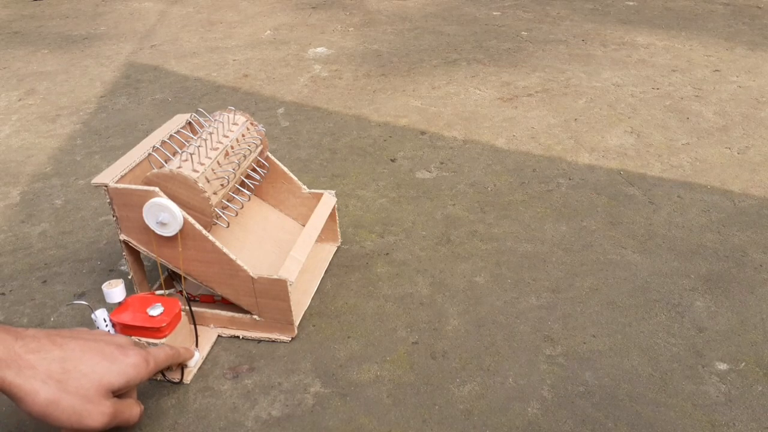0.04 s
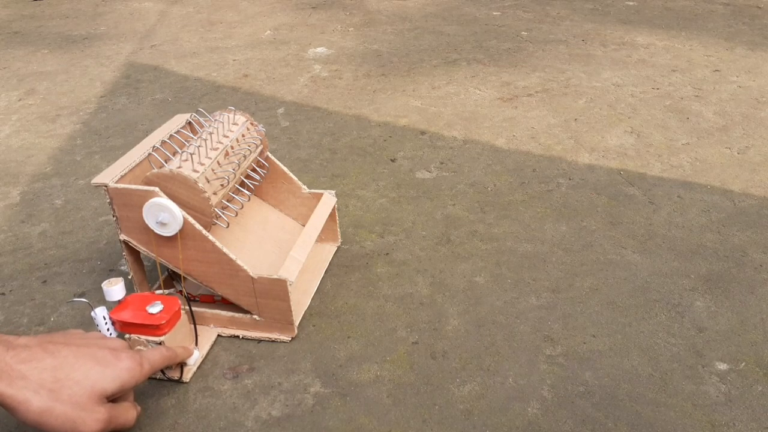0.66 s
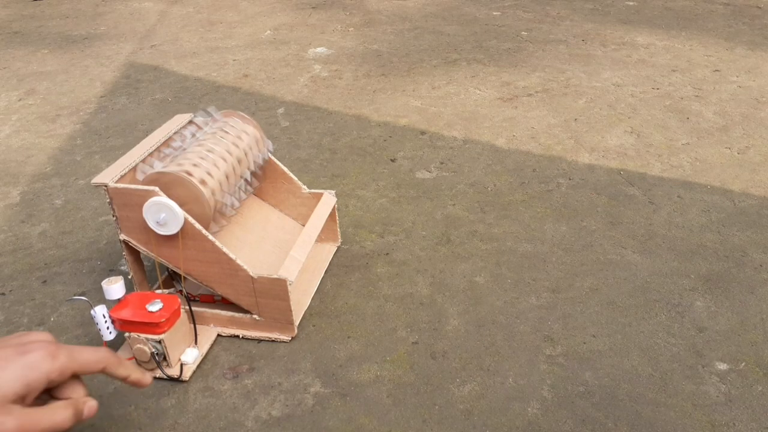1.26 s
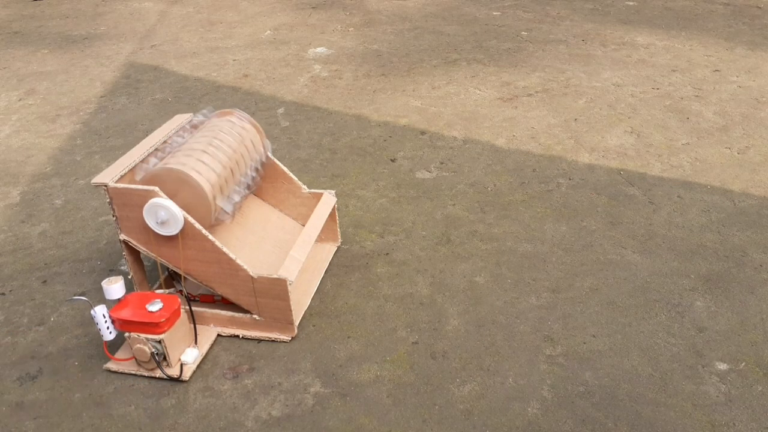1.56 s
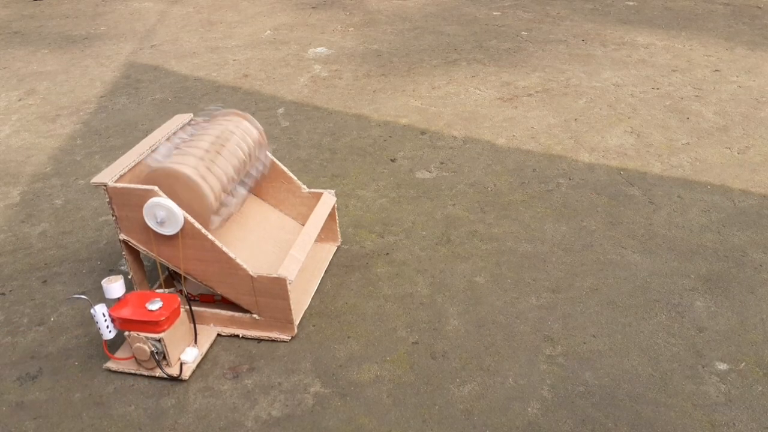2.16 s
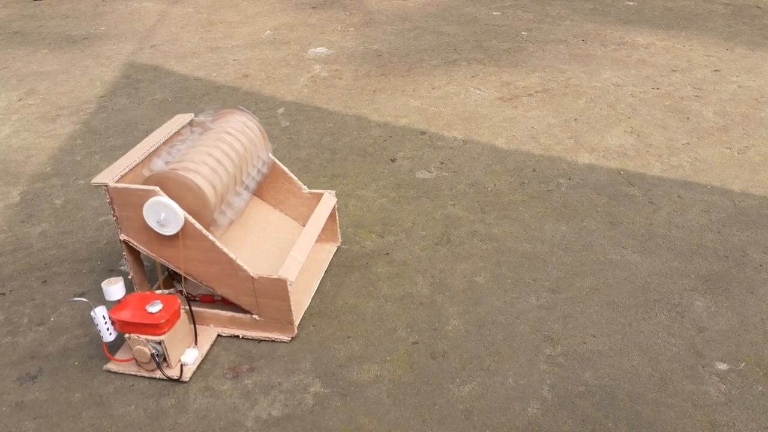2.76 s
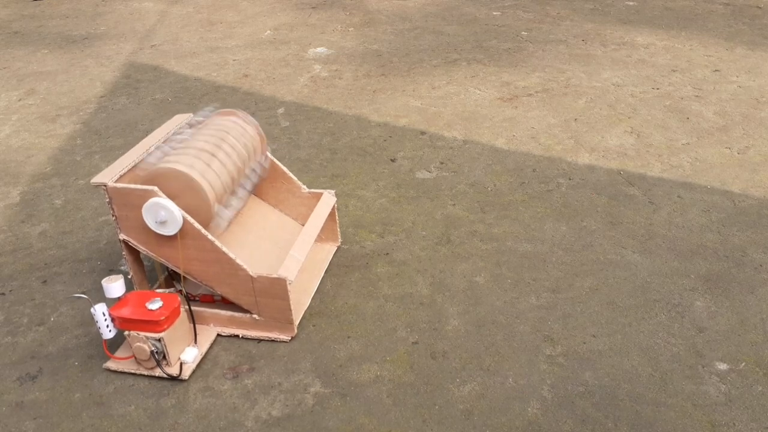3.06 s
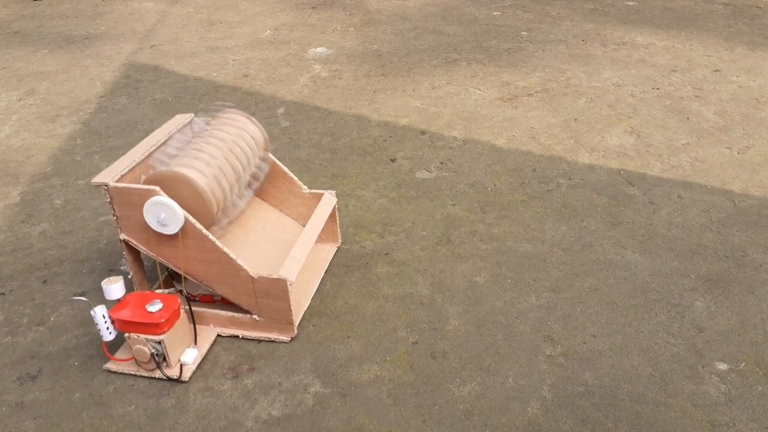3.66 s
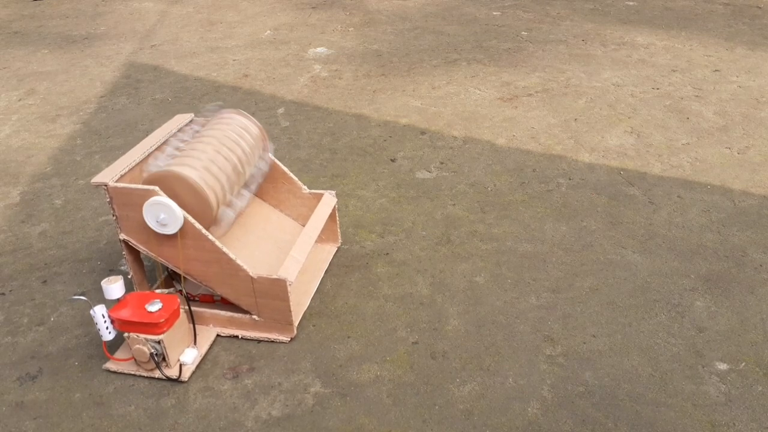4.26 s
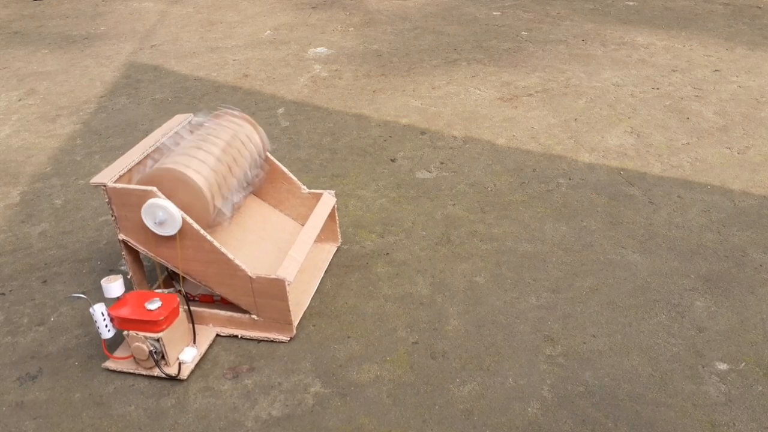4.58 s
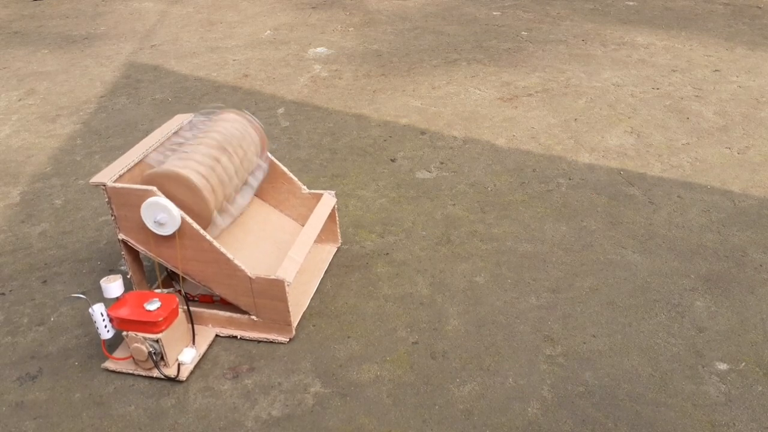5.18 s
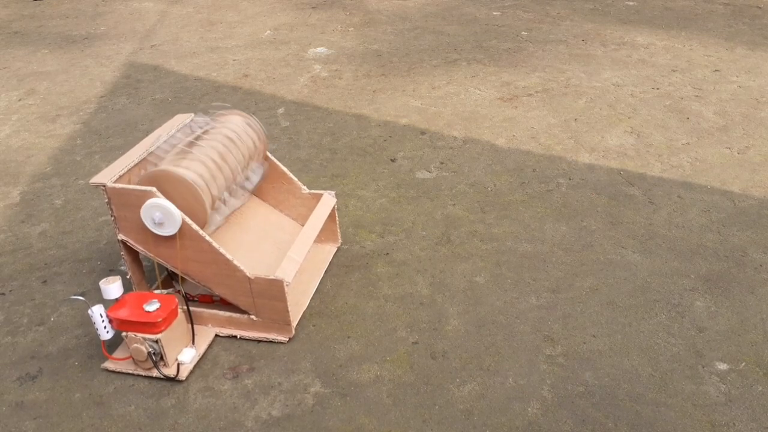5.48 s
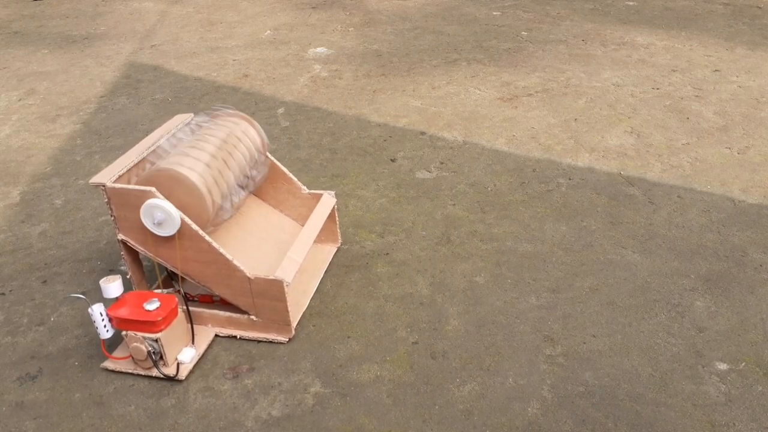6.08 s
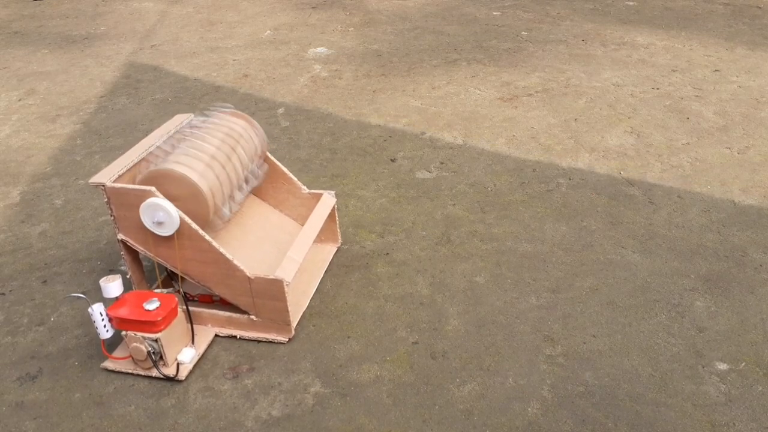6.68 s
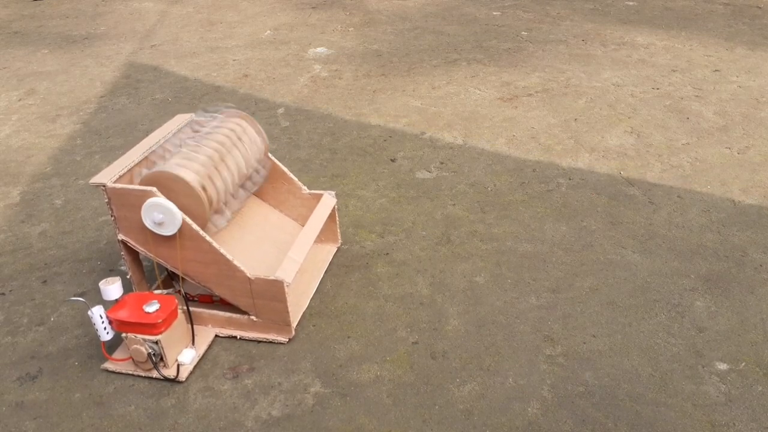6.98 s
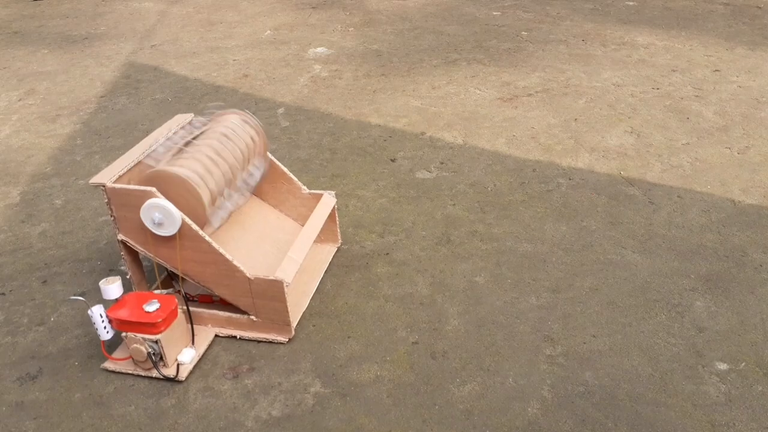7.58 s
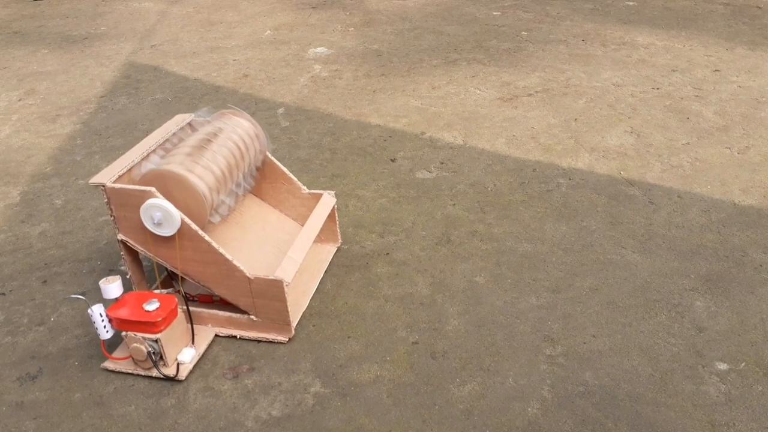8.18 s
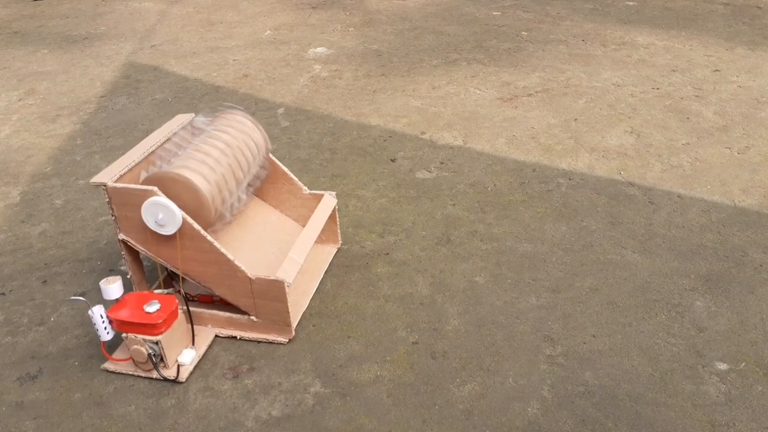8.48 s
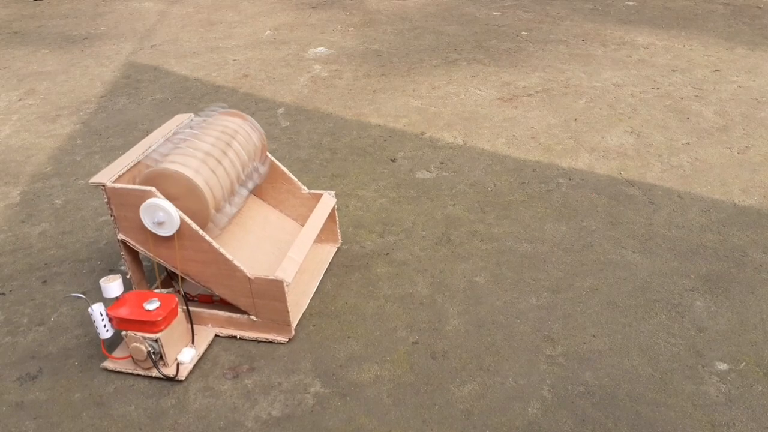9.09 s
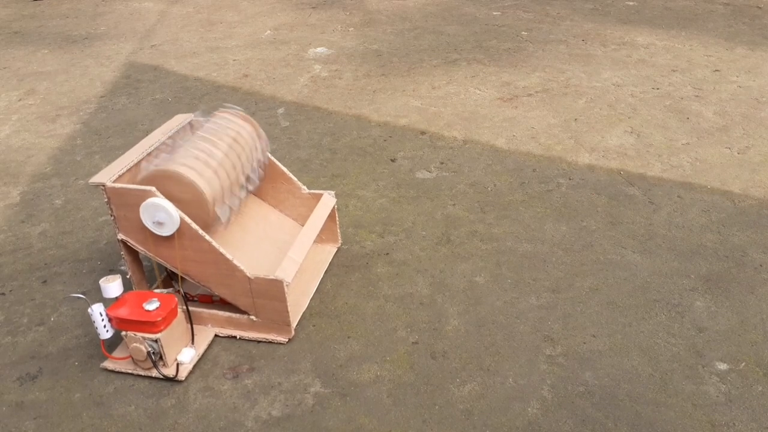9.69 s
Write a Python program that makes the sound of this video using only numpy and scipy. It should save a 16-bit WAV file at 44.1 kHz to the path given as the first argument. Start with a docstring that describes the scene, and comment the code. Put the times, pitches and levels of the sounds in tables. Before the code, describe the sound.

In a quiet yard, two crisp clicks of a button start a small wooden machine. Its electric motor and drum gather speed, the shaft rasping and rubbing on each turn. A fast, hollow wooden knocking takes over, mixed with thin scraping. It grows briefly harsher midway, then keeps rattling at a nearly even pace to the end.

```python
"""A wooden model machine in a yard. Over a faint hum a switch snaps down (0.75 s) and back (1.02 s). From 1.1 s
a small electric motor, brushes whirring, spins up the spiked drum to about 17 turns/s; the drum rumbles and its
shaft rubs at tight spots on every turn. From 2.5 s the shaft knocks in its loose bearings, a double blow per
turn that rings the wooden frame and echoes round the yard. The knocking is harder and brighter from 4.1 to 5.3
s, then runs on as the speed slowly sags."""
import sys
import numpy as np
from scipy import signal
from scipy.fft import rfft, irfft
from scipy.io import wavfile

SR = 44100
rng = np.random.default_rng(int(sys.argv[2]) if len(sys.argv) > 2 else 0)


def to_wav(sig):
    """Store sig (one row per channel, or 1-D mono) as 16-bit WAV at the path in sys.argv[1].

    Samples outside -1..1 are clipped; the rate is SR.
    """
    pcm = np.clip(np.atleast_2d(sig), -1, 1) * 32767
    pcm = np.round(pcm).astype(np.int16)
    wavfile.write(sys.argv[1], SR, pcm.T)  # frames by channels


N = 433944
TIME = np.arange(N) / SR
FREQS = np.arange(8193) * SR / 16384 + 1e-3
LOOSE_S, KNOCK_RISE_S = 2.5, 0.16  # shaft bounces free of its bearings

# spectrum of the shaken wooden base: (frequency [Hz], relative level [dB])
RUMBLE_SPECTRUM = [(25, -21), (60, -13), (100, -4.5), (135, 1), (200, -1.5), (340, 1.5), (480, -5),
                   (700, -12), (1100, -23.5), (2000, -29)]
# spectra of the button's snaps: (frequency [Hz], relative level [dB])
PRESS = [(59, -36), (100, -14), (394, -0.5), (791, -22), (1590, -24), (1920, -10), (2750, -33), (3180, -7),
         (3770, -1.5), (5630, -15), (6120, -26), (7560, -8), (10800, -29), (12800, -17), (15500, -19.5)]
RELEASE = [(59, -45), (100, -4), (447, -3.5), (1370, -6.5), (1960, -12), (2810, -12.5), (3770, 0),
           (4750, -12), (5400, -4), (6120, -19), (8410, -13), (9740, -31), (11800, -25), (13100, -7),
           (15500, -11.5)]


def undb(db):
    """Decibels to gain."""
    return 10 ** (np.asarray(db) / 20)


def minimum_phase(gain):
    """Most compact impulse response with these gains."""
    cepstrum = irfft(np.log(gain))
    half = len(cepstrum) // 2
    cepstrum[1:half] *= 2
    cepstrum[half + 1:] = 0
    return irfft(np.exp(rfft(cepstrum)))[:half]


def colour(spectrum, skirt_db_per_oct=24):
    """Unit-energy impulse response of a (Hz, dB) spectrum, rolled off beyond its ends."""
    hz, db = np.transpose(spectrum)
    outside_oct = np.abs(np.log2(FREQS / np.clip(FREQS, hz[0], hz[-1])))
    gain_db = np.interp(np.log(FREQS), np.log(hz), db) - skirt_db_per_oct * np.minimum(outside_oct, 2)
    response = minimum_phase(undb(gain_db))
    return response / np.linalg.norm(response)


def through(x, response):
    """Convolve, cut to scene length."""
    return signal.oaconvolve(x, response)[:N]


def add(out, at_s, sound):
    """Mix a sound in at a time."""
    start = int(np.clip(round(at_s * SR), 0, N))
    out[start:start + len(sound)] += sound[:N - start]


def wander(rate_hz):
    """Smooth random drift, spread near 1."""
    points = rng.standard_normal(2 ** 14)
    return np.interp(TIME * rate_hz, np.arange(len(points)), points)


def looseness(time_s, rise_s):
    """How far the shaft has worked loose, 0 to 1."""
    return 1 - np.exp(-np.maximum(time_s - LOOSE_S, 0) / rise_s)


def harshness(time_s, from_s=4.11, to_s=5.33, fade_s=0.25):
    """1 in the spell of hard knocking, 0 outside."""
    return np.clip(.5 + np.minimum(time_s - from_s, to_s - time_s) / fade_s, 0, 1)


def speed_gain(pace, base_db, rise_db):
    """Gain proportional to pace (share of full speed), with rise_db more from rest to full speed."""
    return pace * undb(base_db + rise_db * (pace - 1))


def yard_hum(level_db=-81.0):
    """Faint, slowly wavering outdoor hum."""
    # ambient noise: (frequency [Hz], relative level [dB])
    spectrum = [(18, -49), (30, -19), (216, -18.5), (296, -1), (355, -12.5), (524, -26), (597, -20),
                (680, -28), (2770, -27.5), (3230, -25), (3590, -30), (5170, -35), (8040, -29), (9390, -35),
                (15000, -35)]
    return undb(level_db + 1.8 * wander(5)) * through(rng.standard_normal(N), colour(spectrum))


def yard_echo(x, t60_s, wet_db):
    """Direct sound plus duller, scattered reflections from ground and walls."""
    t = TIME[:SR // 2]
    tail = rng.standard_normal(len(t)) * np.exp(-np.log(1000) * t / t60_s) * (1 - np.exp(-t / .012))
    tail = signal.sosfilt(signal.butter(1, 7000, fs=SR, output="sos"), tail)
    return x + undb(wet_db) * through(x, tail / np.linalg.norm(tail))


def motor_brushes(pace, full_speed_db=-62):
    """Brushes whirr on the commutator; noise power grows with speed."""
    # sliding noise: (frequency [Hz], relative level [dB])
    spectrum = [(3400, -11), (4200, 3), (5000, -8), (6500, -24), (8300, -6.5), (9200, -17)]
    envelope = np.sqrt(pace) * undb(full_speed_db + 1.8 * wander(200))
    return through(envelope * rng.standard_normal(N), colour(spectrum))


def switch(shudder_decay_s=0.04):
    """Plastic snaps as the button goes down and comes back; each shakes the wooden base."""
    # button snaps: (time [s], peak [dB], spectrum, shudder [dB])
    clicks = [(0.711, -62, PRESS, -64), (0.7435, -59, PRESS, -78), (0.751, -18.5, PRESS, -55),
              (1.0226, -14.5, RELEASE, -49.5)]
    snaps, shudder = np.zeros(N), np.zeros(N)
    for at_s, peak_db, spectrum, shudder_db in clicks:
        snap = colour(spectrum)
        add(snaps, at_s, undb(peak_db) * snap / np.abs(snap).max())
        add(shudder, at_s, undb(shudder_db) * np.exp(-TIME[:SR // 2] / shudder_decay_s))
    snaps = yard_echo(snaps, t60_s=0.36, wet_db=-17)
    return snaps + through(shudder * rng.standard_normal(N), colour(RUMBLE_SPECTRUM))


def contact_power(turns, spots, catch_deg=3.1):
    """One power curve per level column; each spot round the turn catches quickly, then fades."""
    degrees = np.arange(360)
    angle_deg, fade_deg, *levels_db = np.transpose(spots)[:, :, None]
    past_deg = (degrees - angle_deg) % 360
    grip = (1 - np.exp(-past_deg / catch_deg)) * np.exp(-past_deg / fade_deg)
    powers = [np.sum((undb(db) * grip) ** 2, axis=0) for db in levels_db]
    return [np.interp(turns % 1 * 360, degrees, power) for power in powers]


def shaft_contact(turns, even_chatter_db=-7, even_hiss_db=-12.5, harsh_chatter_db=5.5):
    """Chatter, hiss and scrape gains from light all-round contact, tight spots and skids."""
    # tight spots: (shaft angle [deg], fade [deg], chatter [dB], hiss [dB])
    rubs = [(128.8, 32.2, 10, 2), (200, 56, -1.5, -0.5), (269.7, 20, 7, -7)]
    # skids in each double blow: (shaft angle [deg], fade [deg], chatter [dB], hiss [dB], scrape [dB])
    scuffs = [(327.9, 12.5, 12, 0, 10.5), (347.5, 18.4, 8, 6, 9), (10.9, 12, 13.5, 6.5, -6)]
    rub_chatter, rub_hiss = contact_power(turns, rubs)
    scuff_chatter, scuff_hiss, scuff_scrape = contact_power(turns, scuffs)
    loose = looseness(TIME, KNOCK_RISE_S)
    skid = loose * undb(harsh_chatter_db * harshness(TIME))
    chatter_gain = np.sqrt(undb(even_chatter_db) ** 2 + rub_chatter + skid ** 2 * scuff_chatter)
    hiss_gain = np.sqrt(undb(even_hiss_db) ** 2 + rub_hiss + loose ** 2 * scuff_hiss)
    return chatter_gain, hiss_gain, loose * np.sqrt(scuff_scrape)


def drum_rumble(pace, chatter_gain, relief_db=-8, relief_s=0.77):
    """The drum shakes the frame, more where the shaft rubs, less once it bounces free."""
    shake = speed_gain(pace, base_db=-38, rise_db=13.3) * chatter_gain ** 0.47
    shake *= undb(relief_db * looseness(TIME, relief_s))
    return through(shake * rng.standard_normal(N), colour(RUMBLE_SPECTRUM))


def friction(turns, repeat_share, grain_db):
    """Gritty unit-variance noise; part is the shaft's own surface, repeating every turn."""
    surface = rng.standard_normal(2600)
    traced = surface[(turns % 1 * len(surface)).astype(int)]
    grit = undb(grain_db * wander(900))
    noise = (np.sqrt(repeat_share) * traced + np.sqrt(1 - repeat_share) * rng.standard_normal(N)) * grit
    return noise / np.std(noise)


def shaft_rubbing(pace, turns, chatter_gain, hiss_gain, scrape_gain):
    """The shaft chatters and hisses where it rubs, and scrapes brightly as it knocks."""
    # friction spectra: (frequency [Hz], relative level [dB])
    chatter_spectrum = [(600, -13), (1300, -3), (1650, 0.5), (1830, 5), (2100, 0.5), (2350, -6),
                        (2900, -10.5), (3400, -10.5), (4050, -1.5), (4600, -10.5), (6000, -25.5)]
    hiss_spectrum = [(3000, -10.5), (4200, 1.5), (5800, -3), (7200, -0.5), (8300, 2.5), (9200, -10),
                     (10400, -14), (11400, -7), (12100, -7), (13200, -6), (15300, -3.5)]
    scrape_spectrum = [(3000, -2.5), (5800, -8.5), (7800, 2.5), (9200, -9.5), (10500, -13), (11300, 2.5),
                       (12100, -3.5), (13200, 2.5), (14100, 0.5), (15300, 2)]
    rasp_spectrum = [(2300, -9), (2750, -3), (3150, -9), (3400, -9)]
    # stray scrapes in the spin-up: (time [s], decay [s], chatter [dB], hiss [dB])
    strays = [(1.271, 0.018, -67, -59), (1.329, 0.0043, -52, -71), (1.566, 0.032, -72, -65),
              (1.652, .04, -66, -73), (1.84, 0.016, -63, -49)]
    sliding = speed_gain(pace, base_db=-48, rise_db=7.8)
    chatter = speed_gain(pace, base_db=-44.4, rise_db=19.5) * chatter_gain * undb(wander(70))
    hiss = sliding * hiss_gain * undb(1.7 * wander(90))
    scrape = sliding * scrape_gain
    rasp = speed_gain(pace, base_db=-53, rise_db=30) * chatter_gain
    rasp *= 1 - looseness(TIME, rise_s=2.3)  # dry bearing rasps until the play opens
    for at_s, decay_s, chatter_db, hiss_db in strays:
        fade = np.exp(-TIME[:SR // 4] / decay_s)
        add(chatter, at_s, undb(chatter_db) * fade)
        add(hiss, at_s, undb(hiss_db) * fade)
    sound = through(chatter * friction(turns, repeat_share=0.58, grain_db=1.6), colour(chatter_spectrum))
    sound += through(hiss * friction(turns, repeat_share=0.13, grain_db=3), colour(hiss_spectrum))
    sound += through(scrape * friction(turns, repeat_share=0.66, grain_db=1.3), colour(scrape_spectrum))
    sound += through(rasp * friction(turns, repeat_share=0.19, grain_db=5.5), colour(rasp_spectrum))
    return yard_echo(sound, t60_s=0.37, wet_db=-16.5)


def frame_response():
    """Ring of the wooden frame, with the yard's close reflections, after one sharp blow."""
    # resonances of frame and yard: (frequency [Hz], width [Hz], gain [dB])
    modes = [(118.3, 22.0, 7.5), (207.0, 48.4, 10), (314.7, 43, 20.5), (385.6, 38, 11.5), (438, 10.8, 14),
             (485, 148, 13), (614.3, 45, 14.0), (804, 424, 13.5), (863, 12, 17.5), (1030, 49, 14.5),
             (1372, 100, 7.5), (1808, 163, 15), (2044.0, 95, 12), (2920, 1750, 4.5), (3280, 210, 11.0),
             (3930, 770, 14.5)]
    hz, width_hz, db = np.transpose(modes)[:, :, None]
    detune = (FREQS ** 2 - hz ** 2) / (FREQS * width_hz)
    power = np.sum((undb(db) / (1 + detune ** 2)) ** 2, axis=0)
    return minimum_phase(np.sqrt(power + undb(-76)))


def contact_pulse(hardness_hz):
    """Unit-area force of one contact: the harder, the shorter."""
    phase = TIME[:512] * np.sqrt(2) * np.pi * min(hardness_hz, SR / 4)
    force = np.exp(-phase) * np.sin(phase)
    return force / force.sum()


def bearing_knocks(turns, thud_rise_s=0.37, play_db_per_s=0.73, softening_per_s=0.017):
    """The shaft strikes its bearings each turn; as play widens, thud and rebounds grow, hits soften."""
    # leading thud, main knock, then rebounds: (shaft angle [deg], level [dB], hardness [Hz])
    blows = [(-25.5, 6.5, 379), (3, 6, 972), (21, -13, 1090), (46, -6.5, 462), (102.5, 1.4, 202),
             (134, 9.5, 78.6), (172.5, 8.5, 137), (201.5, 0.5, 208), (252, -12, 440)]
    turn_numbers = np.arange(1, int(turns[-1]) + 1)
    scatter = rng.standard_normal((len(turn_numbers), len(blows))).T
    force = np.zeros(N)
    for k, (angle_deg, db, hardness_hz) in enumerate(blows):
        times_s = np.interp(turn_numbers + angle_deg / 360, turns, TIME)
        loose_for_s = times_s - LOOSE_S
        play_db = play_db_per_s * loose_for_s
        if k == 0:  # thud: builds later than the knock
            sizes = looseness(times_s, thud_rise_s) ** 2 * undb(db + play_db + 0.2 * scatter[k])
        elif k == 1:  # main knock
            sizes = looseness(times_s, KNOCK_RISE_S) * undb(db + 0.2 * scatter[k])
        else:  # rebounds: vary more
            sizes = looseness(times_s, KNOCK_RISE_S) * undb(db + play_db + scatter[k])
        hardness_ratios = 1 - softening_per_s * loose_for_s + 0.19 * harshness(times_s)
        for at_s, size, ratio in zip(times_s, sizes, hardness_ratios):
            add(force, at_s, size * contact_pulse(hardness_hz * ratio))
    return -through(force, frame_response())


def scene():
    """One drum speed drives brushes, knocks, rubbing and rumble."""
    # drum spin-up and slow sag: (time [s], speed [turns/s])
    speed_curve = [(1.1, 0.0), (1.373, 7.085), (2.101, 13.919), (2.801, 16.776), (3.347, 17.161),
                   (4.502, 16.956), (6.025, 16.765), (7.669, 16.606), (9.84, 16.586)]
    speed_hz = np.interp(TIME, *np.transpose(speed_curve))
    pace = speed_hz / speed_hz.max()
    turns = np.cumsum(speed_hz) / SR
    chatter_gain, hiss_gain, scrape_gain = shaft_contact(turns)
    machine = switch() + motor_brushes(pace) + bearing_knocks(turns)
    machine += shaft_rubbing(pace, turns, chatter_gain, hiss_gain, scrape_gain)
    machine += drum_rumble(pace, chatter_gain)
    return (machine + yard_hum())[None]


def record(dry, cutoff_hz=15600):
    """Steep low-pass on the top of the treble."""
    return signal.sosfilt(signal.ellip(10, .2, 70, cutoff_hz, fs=SR, output="sos"), dry)


dry = scene()
out = record(dry)
to_wav(out)
```